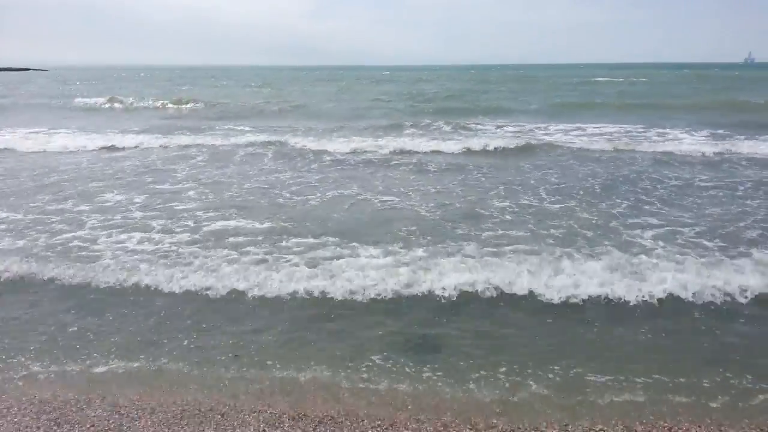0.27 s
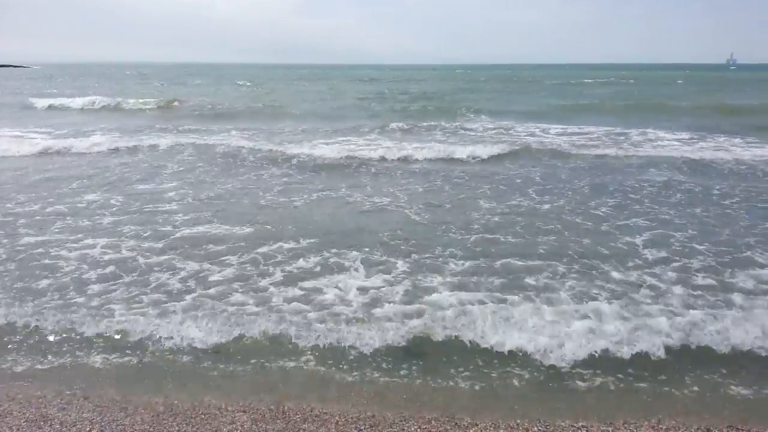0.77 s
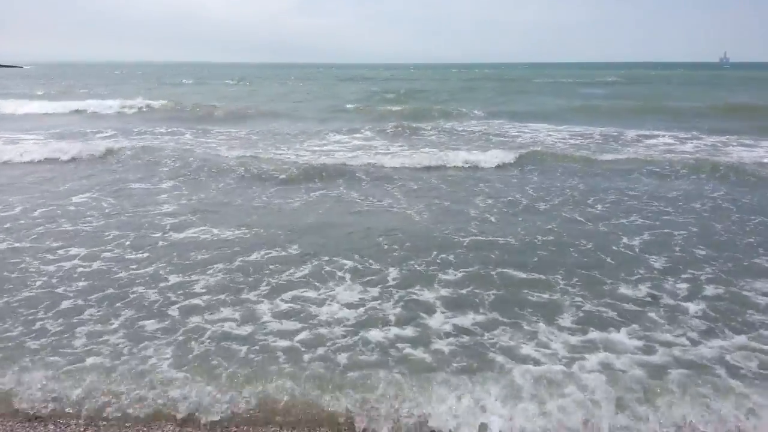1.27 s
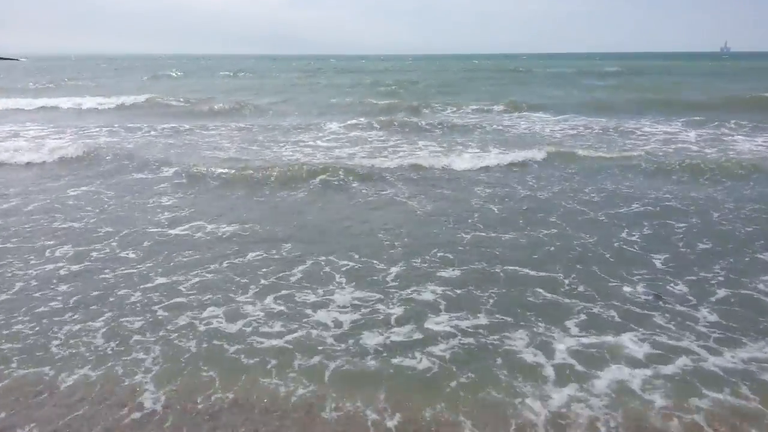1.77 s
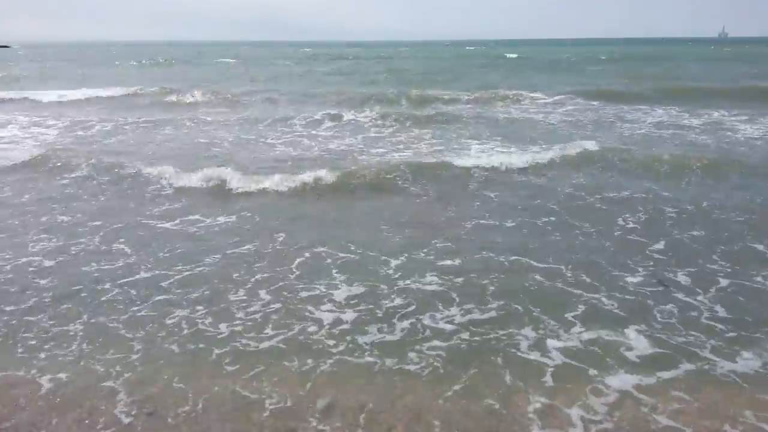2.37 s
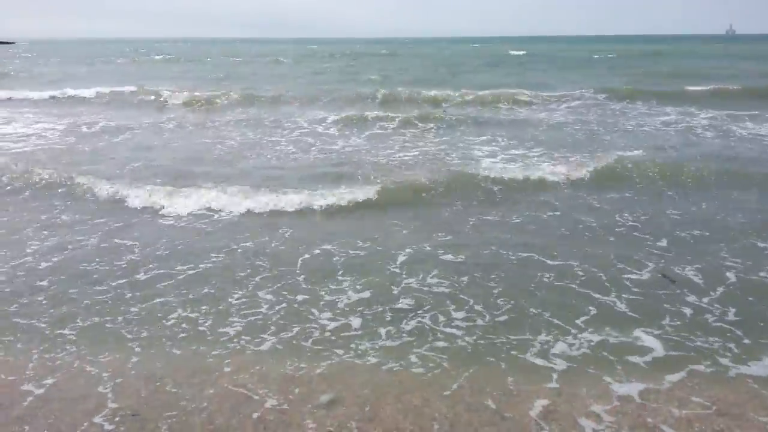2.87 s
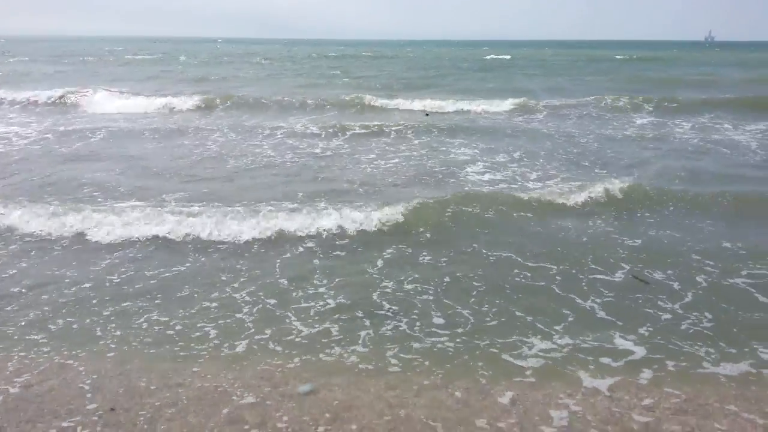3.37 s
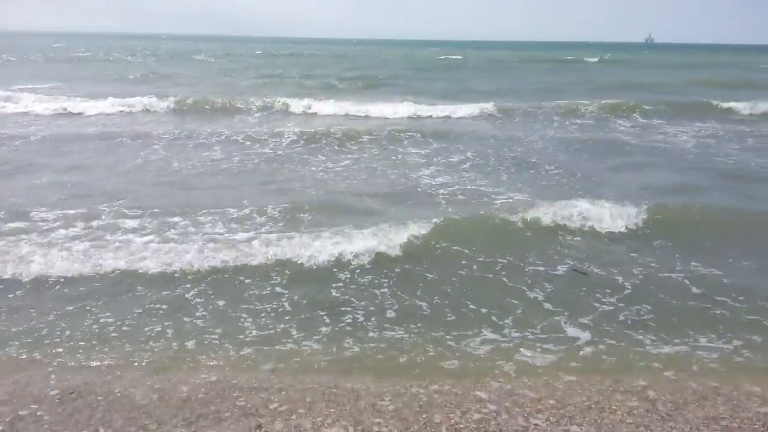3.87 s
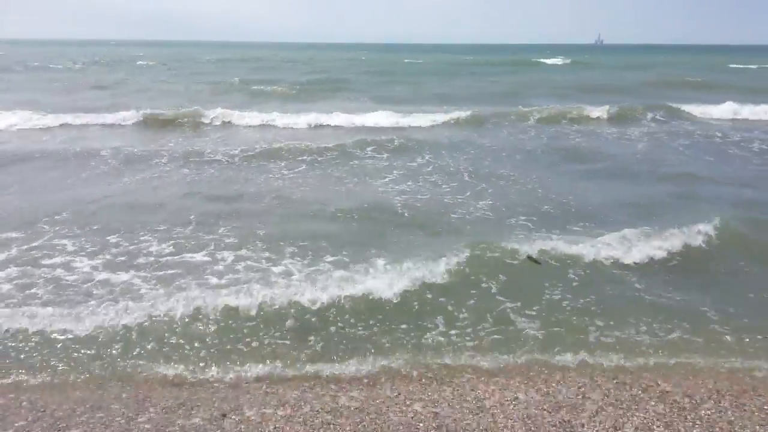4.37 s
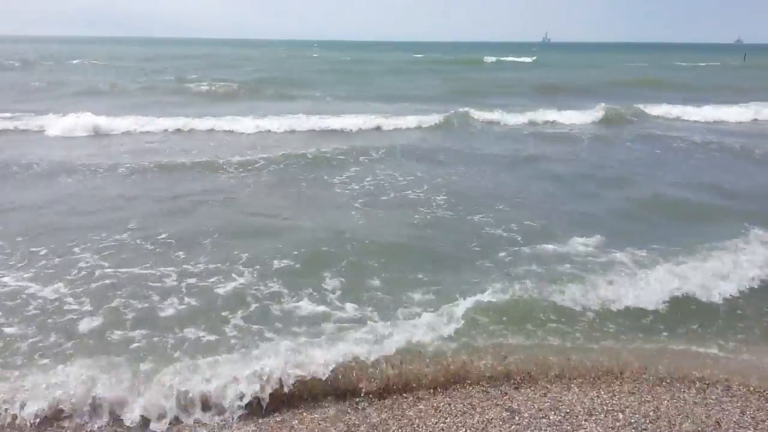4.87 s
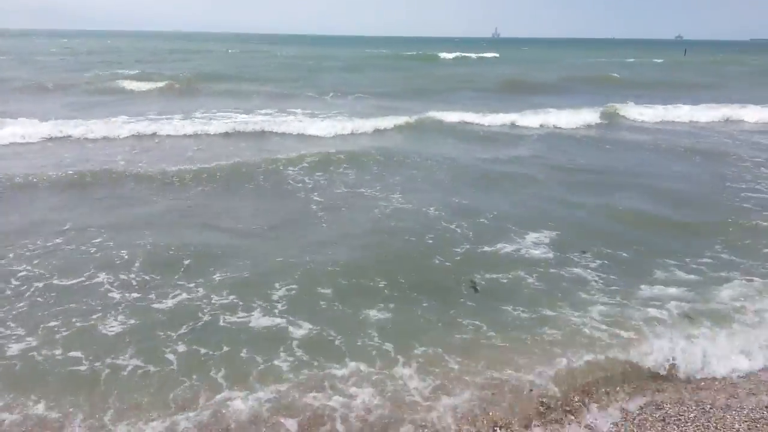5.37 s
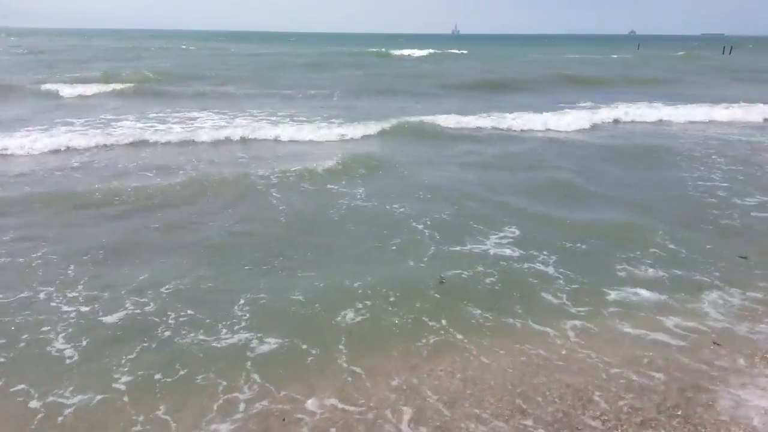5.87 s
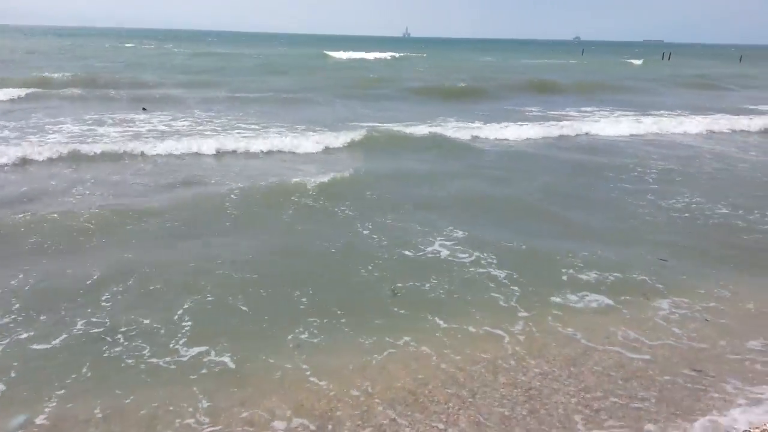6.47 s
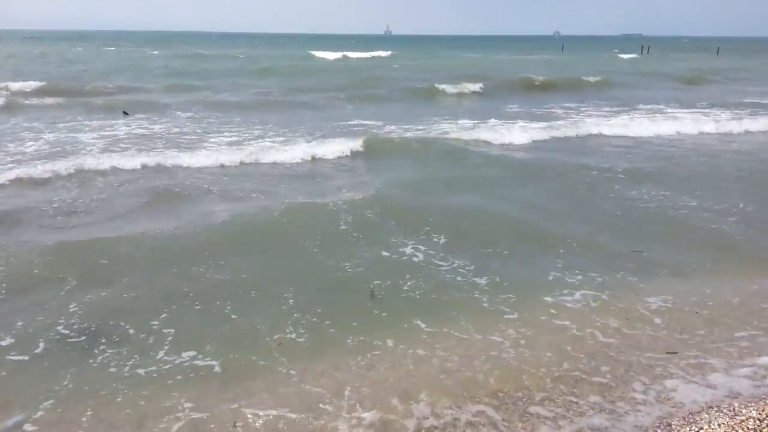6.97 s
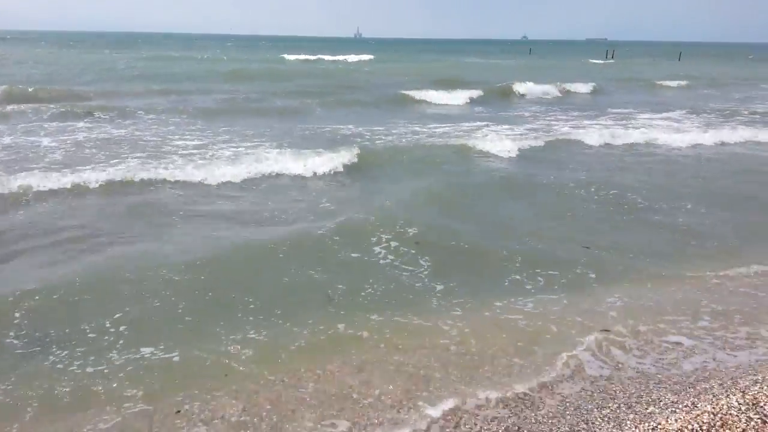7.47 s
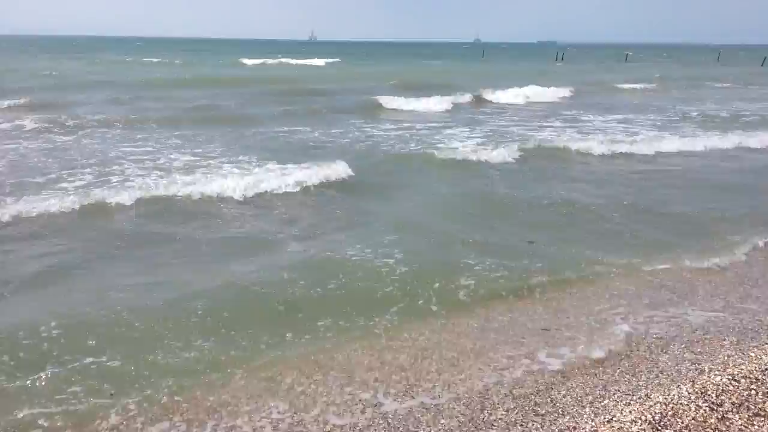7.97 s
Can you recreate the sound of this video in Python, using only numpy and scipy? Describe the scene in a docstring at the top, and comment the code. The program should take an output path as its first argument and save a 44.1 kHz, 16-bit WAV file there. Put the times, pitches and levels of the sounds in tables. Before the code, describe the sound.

Gusty wind thumps and rumbles on a hand-held microphone at the edge of the sea. Nearby, a wave washes up the shore with hissing foam and clattering pebbles, then another splashes down and recedes, while surf roars in the distance. The wind grows stronger, spreading from the left to both sides, and dominates the end with rough, tearing gusts.

```python
"""Small waves on a windy shell beach

Close by, waves spill and run up shells and pebbles: the wash seethes, foam fizzes, pebbles rattle and
spray patters. Farther out, breakers roar. Wind buffets the two unlike microphone ports of a hand-held
camera, first the left, then both, and rasps across the right one when it blows hardest.
A limiter ducks the sea under the strongest blows."""
import sys
import numpy as np
from scipy import signal
from scipy.fft import rfft, irfft, next_fast_len
from scipy.io import wavfile
from scipy.ndimage import uniform_filter1d, minimum_filter1d, map_coordinates

SR = 44100
rng = np.random.default_rng(int(sys.argv[2]) if len(sys.argv) > 2 else 0)


def store_pcm(level_fs):
    """Save levels as 16-bit WAV."""
    pcm = np.round(np.clip(level_fs, -1, 1) * 32767).astype(np.int16)
    wavfile.write(sys.argv[1], SR, np.atleast_2d(pcm).T)


N = 362943

# One wave runs up the shells at 1.8 s; the next spills at 3.5 s, lands at 5 s, splashes and drains.
# Each row: time in seconds, relative wash level in dB, relative fizz level in dB.
WAVE_LEVELS = [(0, -20.5, -27), (0.25, -18, -26.5), (0.8, -19.5, -28), (1.25, -20, -30.5),
               (1.8, -18.5, -25), (2.05, -18.5, -25.5), (2.25, -21.5, -28), (2.7, -22.5, -31),
               (3.3, -21, -30), (3.58, -20.5, -29), (3.85, -22.6, -30.7), (4.8, -23.5, -30.3),
               (5.02, -20.5, -28), (5.4, -20.5, -28.5), (5.56, -19.5, -23.5), (5.71, -26, -30.5),
               (5.88, -22.5, -31.5), (6.17, -28.5, -37), (6.95, -29, -36), (8.2, -33, -37.5)]
# A thin sheet of water, too shallow for big bubbles, runs up the beach and rolls the pebbles.
# Each row: centre in seconds, length in seconds, strength from 0 to 1.
RUN_UP_SHEETS = [(1.9, 0.76, 0.9), (5.15, 0.4, 0.6)]
# The second wave slaps the pebbles. Each row: centre in seconds, length in seconds, level in dB.
WAVE_SLAPS = [(5.05, 0.22, -27), (5.3, 0.23, -27), (5.54, 0.19, -25)]
# Colours of the sea from the beach. Each row: frequency in Hz, relative level in dB.
WASH_COLOUR = [(80, -14.5), (300, -6.5), (650, 3), (1200, -2), (1800, -5), (2700, -2.5), (3900, 1.5),
               (5000, -2.5), (6100, -14), (8000, -12), (14000, -50)]
FIZZ_COLOUR = [(3000, -27), (5200, -3), (6200, -4), (7500, 0), (9000, -2.5), (10500, -6), (12500, -14),
               (15000, -17)]
FAR_SURF_COLOUR = [(30, -36), (60, -23), (250, 0), (700, 4), (1200, -3.5), (2000, -5), (4000, -18),
                   (10000, -55)]
SPRAY_COLOUR = [(2500, -25), (3700, -14), (4700, -2), (5600, -1), (6400, -9), (9000, -14), (14000, -32)]
# The right port hears the sea duller. Each row: frequency in Hz, gain in dB against the left port.
RIGHT_PORT_RESPONSE = [(300, -3.5), (1000, -2), (1500, -3), (2200, -1), (3000, -12), (4000, -21),
                       (5200, -20), (6500, -23), (8300, -17.5), (11000, -12.5), (12500, -22), (14500, -53)]

# Colours of wind on the microphone. Each row: frequency in Hz, relative level in dB.
LEFT_BUFFET_COLOUR = [(20, -48), (42, -40), (70, -21.5), (110, -9.5), (170, -2.5), (270, 2), (420, -2.5),
                      (600, -11.5), (850, -20.5), (1300, -51), (2500, -42), (8000, -75)]
RIGHT_BUFFET_COLOUR = [(20, -44), (42, -42), (70, -24), (110, -9.5), (170, -4), (300, 1), (480, -3),
                       (750, -9.5), (1200, -16), (2000, -28.5), (4000, -31.5), (8000, -92)]
EDGE_RASP_COLOUR = [(200, -27), (550, 2.5), (1000, 4), (1900, -1), (2700, -7.5), (4000, -15.5), (5000, -25),
                    (6300, -37), (8000, -49), (11000, -73)]
# Faster air sheds smaller eddies, which tilts the buffeting toward the treble.
# Each row: time in seconds, left tilt in dB, right tilt in dB.
EDDY_TILTS = [(0, -4, -7), (1.1, -2, -4.5), (1.9, -0.5, -2), (2.3, -1, -6), (2.95, -4, -3), (3.6, -1, -5.5),
              (4.8, 0.5, 0), (5.3, -3, 1), (6.1, -0.5, -0.5), (6.8, -0.5, -1.5), (8.2, 1.5, 5)]
# The breeze freshens on the left port, then swings onto the right one too.
# Each row: time in seconds, left force in dB, right force in dB.
BREEZE_FORCE = [(0, -29.5, -28.5), (0.73, -24.5, -24), (1.0, -16, -23.5), (1.3, -13, -22.5),
                (1.5, -10, -22), (1.9, -12.5, -29), (2.2, -10.5, -24), (2.7, -16, -25), (3.3, -13.5, -24.5),
                (3.65, -14, -25), (4.35, -11, -26), (5.25, -11.5, -23.5), (5.32, -11.5, -14),
                (6.2, -10, -12), (6.8, -11, -10), (8.2, -11.6, -11)]
# Gusts on top of the breeze, lulls where negative.
# Each row: centre in seconds, length in seconds, left change in dB, right change in dB.
GUSTS_AND_LULLS = [(0.055, 0.098, 7.5, 11.5), (0.173, 0.047, 7, 9), (0.317, 0.099, 7, 6),
                   (0.51, .05, 10, 10.5), (0.605, .04, 8, 7), (0.73, .04, -13, -7), (0.776, 0.072, 7, 9),
                   (0.96, 0.15, -2, 6), (1.157, 0.029, -10, -1), (1.228, .07, 1.5, 1), (1.34, 0.05, -5, 0),
                   (1.471, 0.051, -2.5, 12.5), (1.813, .06, -1, 5), (2.184, 0.054, 2.5, 2),
                   (2.363, 0.04, -5, -9), (2.405, 0.039, 0.5, 8), (2.573, 0.066, 3, 7),
                   (2.677, 0.031, -1, -15), (2.765, 0.22, 3, 0), (2.89, 0.19, -2, 6),
                   (3.018, 0.031, 6.5, 0), (3.095, 0.046, -4.5, -9), (3.138, 0.047, 4, 3),
                   (3.6, .13, -0.5, 7.5), (3.72, 0.13, 3, 6), (3.843, 0.081, 6.5, 4), (3.975, .06, -1.5, 1),
                   (4.102, 0.032, 5.5, 9), (4.248, 0.031, 2, 6), (4.4, 0.12, 4, 2), (4.48, 0.089, 3, 8.5),
                   (4.637, 0.058, 0.5, -5), (4.787, 0.22, 3.5, 4.5), (4.948, 0.052, 2.5, 12.5),
                   (4.99, .04, -4, 7), (5.06, .05, 2, 0), (5.115, 0.039, -3.5, -2), (5.16, 0.03, 4, 5),
                   (5.203, 0.06, -1, -3), (5.368, 0.084, 4, -1), (5.668, 0.087, 4.5, 1),
                   (5.763, 0.11, -2.5, -1.5), (6.122, 0.05, 3, 3), (6.214, 0.033, 6.5, 4.5),
                   (6.83, 0.052, 4, -2.5), (6.9, .055, -3.5, -1), (7.002, 0.083, 1.5, -1.5),
                   (7.054, 0.079, 0.5, 5), (7.26, 0.055, -1, -1)]
# Small eddies whoosh on the left port. Each row: centre in seconds, length in seconds, rise in dB.
LEFT_FLURRIES = [(2.785, 0.073, 10), (3.16, 0.064, 14.5), (4.005, 0.065, 10.5), (6.01, 0.067, 9),
                 (6.45, 0.055, 10), (7.22, 0.2, 5)]
# The flow tears harder at the right port, or eases where negative.
# Each row: centre in seconds, length in seconds, change in dB.
RIGHT_TEARS = [(1.47, .05, -4), (3.77, 0.031, 8.5), (4.48, .05, 3), (4.953, .06, 0.5), (5.34, 0.075, 6.5),
               (5.84, 0.035, 7.5), (5.9, 0.056, 4.5), (6.33, 0.054, 6), (6.4, 0.065, 5), (6.68, 0.031, 3),
               (6.885, 0.071, 4), (6.99, .04, -2), (7.07, 0.081, -2), (7.225, 0.14, 5.5),
               (7.345, 0.065, 7.5), (7.43, .1, -1.5), (7.72, 0.044, -0.5), (7.88, 0.04, 3),
               (8.12, 0.45, 2.5)]
USUAL_LEFT_DB, USUAL_RIGHT_DB = -22, -11.5  # force that neither brightens nor dulls a port


def amp(db):
    """Decibels to gain."""
    return 10 ** (np.asarray(db) / 20)


def unit(x):
    """Scale to rms 1."""
    return x / np.sqrt(np.mean(x ** 2) + 1e-20)


def curves(rows):
    """One value per sample for each column after the time."""
    times, *columns = np.transpose(rows)
    return [np.interp(np.arange(N) / SR, times, column) for column in columns]


def swells(rows):
    """Summed bell shapes. Each row: centre in seconds, length in seconds, height."""
    t = np.arange(N) / SR
    return sum(height * np.exp(-(2 * (t - centre) / length) ** 2) for centre, length, height in rows)


def wobble(rate):
    """A smooth random curve, rate knots a second."""
    knots = rng.standard_normal(int(N * rate / SR) + 4)
    return map_coordinates(knots, [np.arange(N) * rate / SR])


def filtered(x, response):
    """x through a gain given as a function of frequency."""
    size = next_fast_len(N + SR // 2)
    return irfft(rfft(x, size) * response(np.fft.rfftfreq(size, 1 / SR)), size)[..., :N]


def coloured(x, points):
    """x through (Hz, dB) points joined on a log axis."""
    points_hz, db = np.transpose(points)
    return filtered(x, lambda hz: amp(np.interp(np.log(hz + 1), np.log(points_hz), db)))


def split(x, corner_hz, order):
    """The parts of x below and above a corner."""
    below = filtered(x, lambda hz: 1 / (1 + (hz / corner_hz) ** order))
    return below, x - below


def patchy(depth_db):
    """Unrelated noise for each port, with drifting patches of gain in time and frequency."""
    spectra = signal.stft(rng.standard_normal((2, N)), nperseg=512)[2]
    patches = uniform_filter1d(rng.standard_normal(spectra.shape), size=8, axis=1)
    patches = unit(uniform_filter1d(patches, size=14, axis=2))
    return unit(signal.istft(spectra * amp(depth_db * patches), nperseg=512)[1][:, :N])


def grains(pitch_hz, spread, cycles, scatter_db, rise=0, count=9000):
    """For each port, a cloud of tiny damped rings of random pitch and strength, rms 1."""
    age = np.arange(192)  # samples
    ports = []
    for _ in range(2):
        starts = (rng.random((count, 1)) * N).astype(int)
        hz = np.clip(pitch_hz * np.exp(spread * rng.standard_normal((count, 1))), 500, SR / 3)
        strength = amp(scatter_db * np.minimum(rng.exponential(size=(count, 1)), 2 * np.pi))
        turns = hz * age / SR
        decay = np.exp(-turns / cycles)
        rings = strength * decay * np.sin(2 * np.pi * turns * (1 + rise * (1 - decay)))
        ports.append(unit(np.bincount((starts + age).ravel(), rings.ravel(), N)[:N]))
    return np.array(ports)


def wash(level_db):
    """Bubbles ring in the near water, each note rising as it nears the surface."""
    bubbles = grains(pitch_hz=2385, spread=0.596, cycles=5.0, scatter_db=2.5, rise=0.16)
    water = unit(coloured(patchy(depth_db=1.0) + amp(-14.5) * bubbles, WASH_COLOUR))
    body, seethe = split(water, corner_hz=1630, order=8)
    shallow_db = -6 * swells(RUN_UP_SHEETS)  # a thin sheet loses body
    return amp(level_db + 3) * (amp(shallow_db) * body + seethe)


def fizz(level_db, churn_db):
    """Foam bursts and shells tick at the water's edge."""
    ticks = grains(pitch_hz=7480, spread=0.47, cycles=2.7, scatter_db=3.5)
    foam = unit(coloured(patchy(depth_db=1.1) + amp(-13.5) * ticks, FIZZ_COLOUR))
    coarse, fine = split(foam, corner_hz=11000, order=12)
    fresh_db = 0.84 * (level_db + 28.5)  # fresh, loud foam holds the finest bubbles
    return amp(level_db + churn_db + 0.77) * (coarse + amp(fresh_db) * fine)


def far_surf():
    """The outer breakers roar steadily in the distance."""
    return amp(-25.5 + 0.22 * wobble(2.25)) * unit(coloured(patchy(depth_db=2.5), FAR_SURF_COLOUR))


def buffet(level_db, tilt_db, flurry_db, colour, flutter_db, lumps_db, eddy_hz, brighten, usual_db):
    """Turbulence right on one port: lumps of pressure, with more small eddies the harder it blows."""
    force_db = level_db + flutter_db * wobble(16) + lumps_db * wobble(45)
    eddies = unit(coloured(rng.standard_normal(N), colour))
    body, small = split(eddies, eddy_hz, order=4)
    large, medium = split(body, corner_hz=223, order=4)
    small_db = tilt_db + flurry_db + brighten * (force_db - usual_db)
    return amp(force_db) * (amp(-0.7 * tilt_db) * large + medium + amp(small_db) * small)


def shingle():
    """Pebbles rolled by the run-up clack against each other in a dense rattle."""
    clacks = grains(pitch_hz=2160, spread=0.23, cycles=6.4, scatter_db=1.5)
    return amp(-26) * swells(RUN_UP_SHEETS) * clacks


def spray():
    """The wave strikes the pebbles and throws up a brief, bright patter of drops."""
    envelope = swells((centre, length, amp(db)) for centre, length, db in WAVE_SLAPS)
    drops = grains(pitch_hz=4970, spread=0.27, cycles=3, scatter_db=-0.5)
    return envelope * unit(coloured(rng.standard_normal((2, N)) + amp(-1) * drops, SPRAY_COLOUR))


def rasp(force_db):
    """The flow tears at the right port's edge in quick, bright spurts, growing steeply with force."""
    tear_db = swells(RIGHT_TEARS)
    level_db = -18.5 + 1.23 * (force_db - USUAL_RIGHT_DB) + tear_db
    spurts = unit(amp(0.63 * wobble(45) + 2.96 * wobble(260)))
    flow = unit(coloured(rng.standard_normal(N), EDGE_RASP_COLOUR))
    dull, bright = split(flow, corner_hz=1300, order=4)
    return amp(level_db) * spurts * (dull + amp(0.22 * tear_db) * bright)


def sea():
    """Near and far water as heard from the beach, duller at the right port."""
    wash_db, fizz_db = curves(WAVE_LEVELS)
    churn_db = 0.48 * wobble(13)  # wash and foam waver together
    left, right = wash(wash_db + churn_db) + fizz(fizz_db, churn_db) + far_surf() + shingle() + spray()
    return np.array([left, coloured(right, RIGHT_PORT_RESPONSE)])


def wind():
    """Breeze and gusts press on each port; the tearing flow grazes the left one too, sounding duller."""
    left_db, right_db = curves(BREEZE_FORCE)
    left_tilt_db, right_tilt_db = curves(EDDY_TILTS)
    left_db += swells((centre, length, db) for centre, length, db, _ in GUSTS_AND_LULLS)
    right_db += swells((centre, length, db) for centre, length, _, db in GUSTS_AND_LULLS)
    left = buffet(left_db, left_tilt_db, flurry_db=swells(LEFT_FLURRIES), colour=LEFT_BUFFET_COLOUR,
                  flutter_db=0.16, lumps_db=1.0, eddy_hz=516, brighten=0.32, usual_db=USUAL_LEFT_DB)
    right = buffet(right_db, right_tilt_db, flurry_db=0, colour=RIGHT_BUFFET_COLOUR,
                   flutter_db=0.8, lumps_db=1.7, eddy_hz=650, brighten=0.089, usual_db=USUAL_RIGHT_DB)
    grazing = coloured(rasp(right_db), [(500, 10), (850, -1.5), (1400, -16), (2500, -28), (6000, -16)])
    return np.array([left + grazing, right + rasp(right_db)])


def scene():
    """Sea and wind at the two microphone ports."""
    return sea() + wind()


def limiter(x, ceiling_db, hold_s):
    """One gain for both channels, pulled down around every peak above the ceiling."""
    needed = np.minimum(1, amp(ceiling_db) / (np.abs(x).max(axis=0) + 1e-9))
    width = max(int(hold_s * SR), 2)
    return x * uniform_filter1d(minimum_filter1d(needed, width), width)


def record(dry):
    """The camera limits the gusts, clips what is left at full scale and cuts off the highest treble."""
    clipped = np.clip(limiter(dry, ceiling_db=1.73, hold_s=0.027), -1, 1)
    return filtered(clipped, lambda hz: hz < 14750)


dry = scene()
out = record(dry)
store_pcm(out)
```